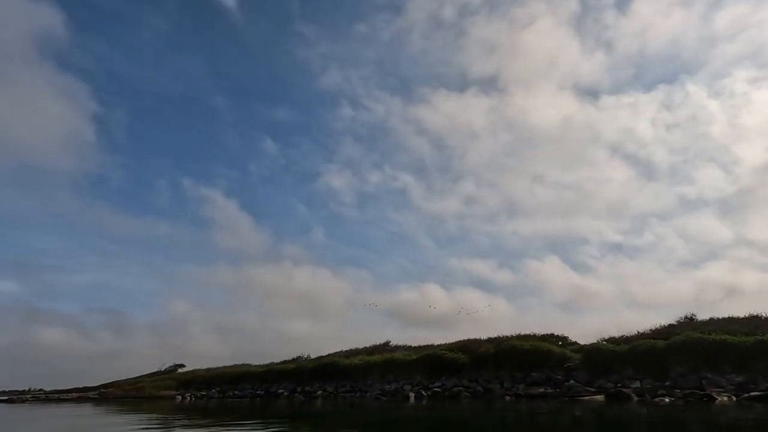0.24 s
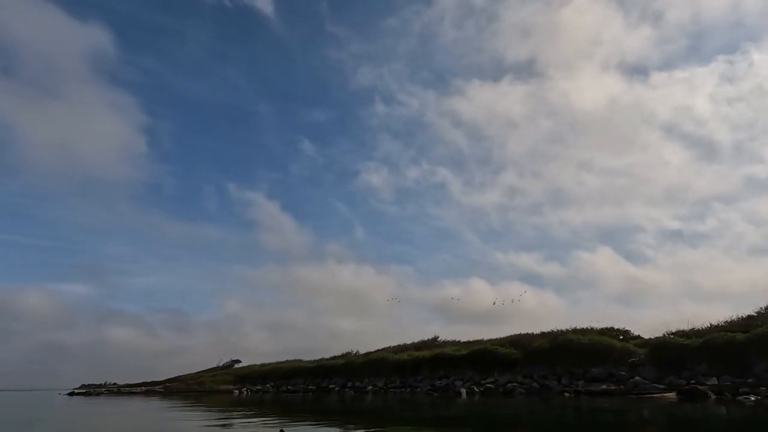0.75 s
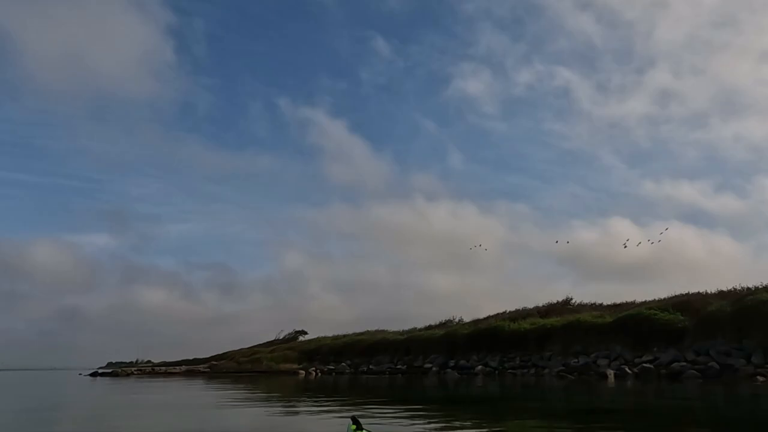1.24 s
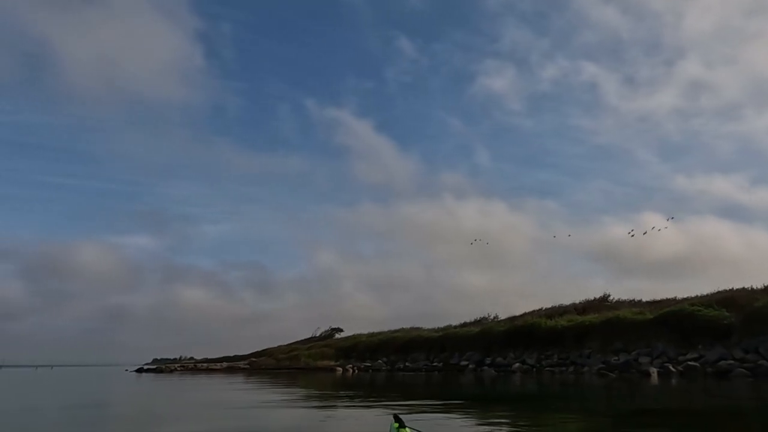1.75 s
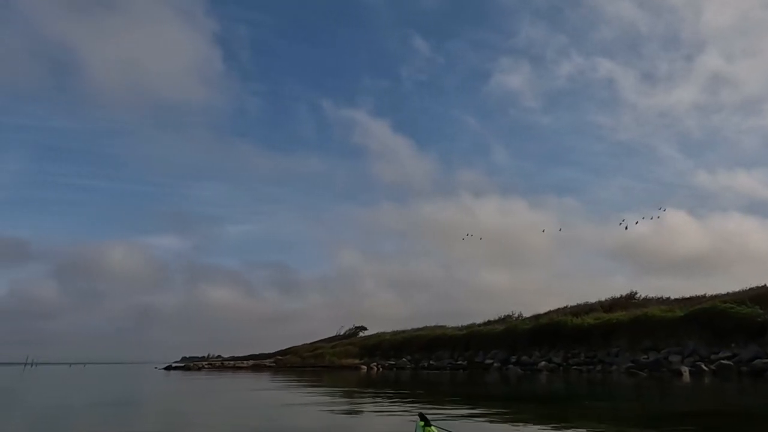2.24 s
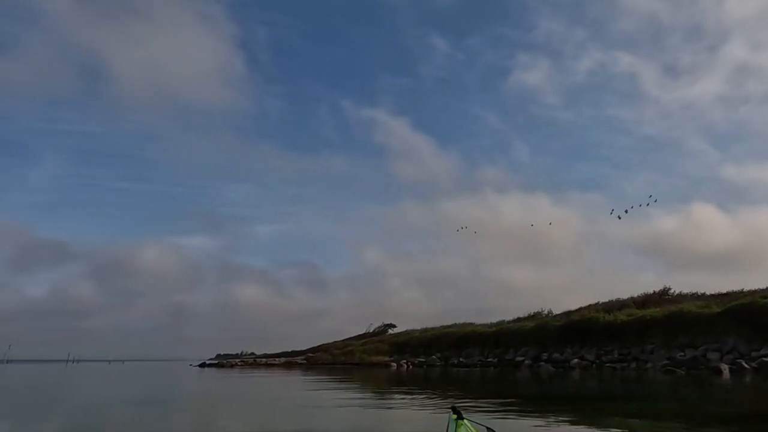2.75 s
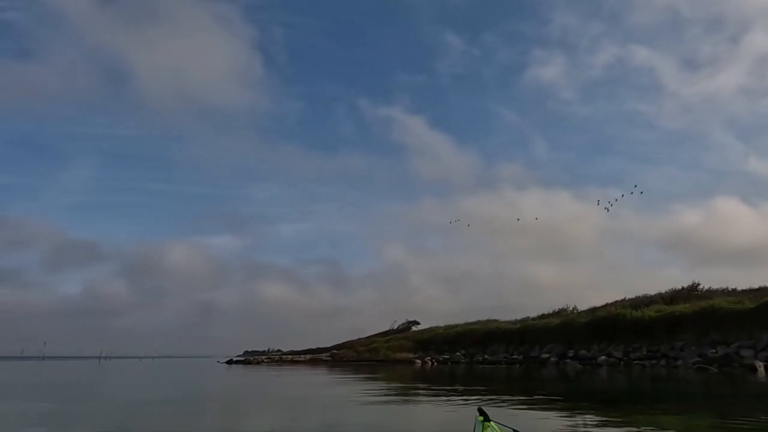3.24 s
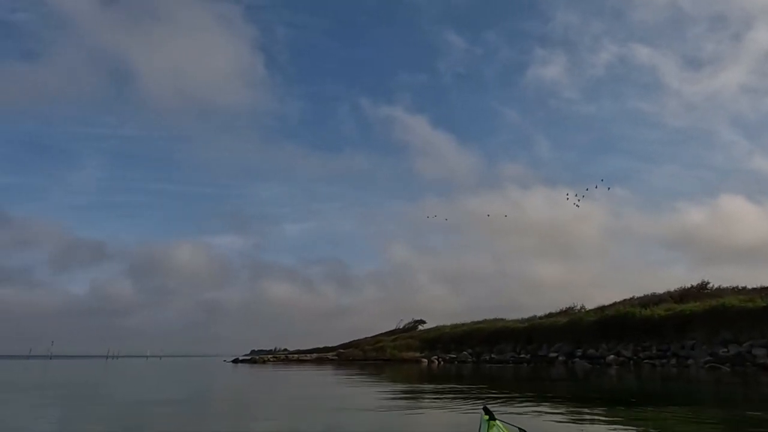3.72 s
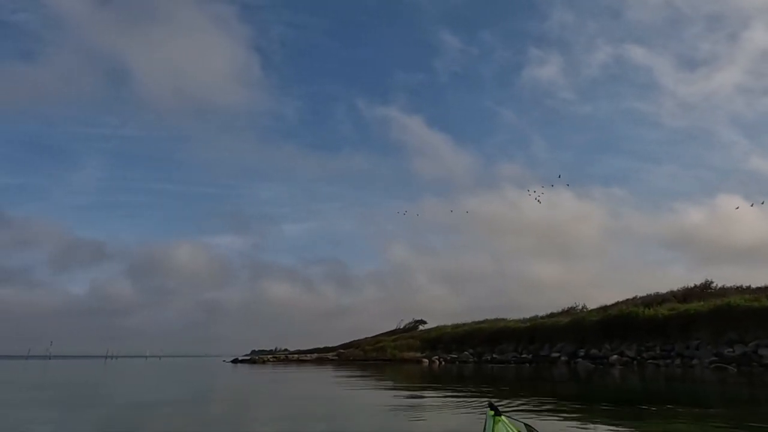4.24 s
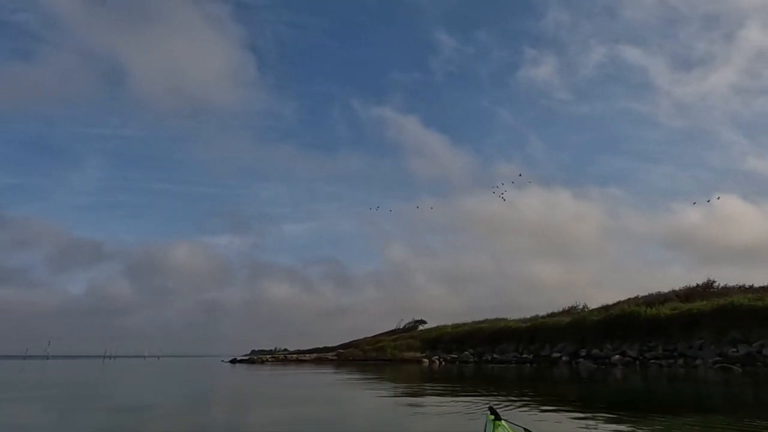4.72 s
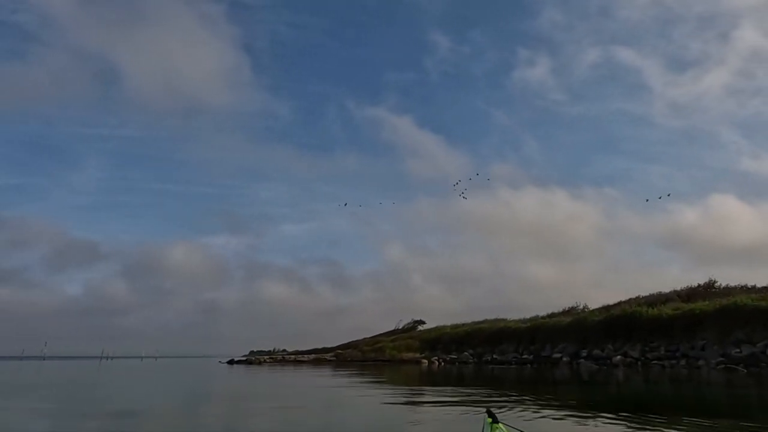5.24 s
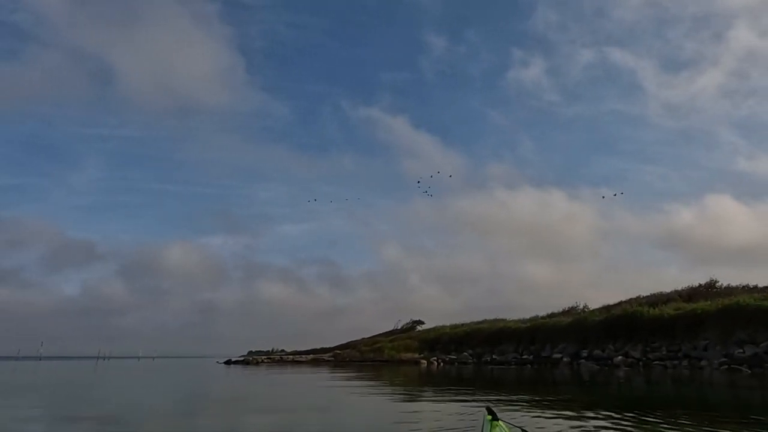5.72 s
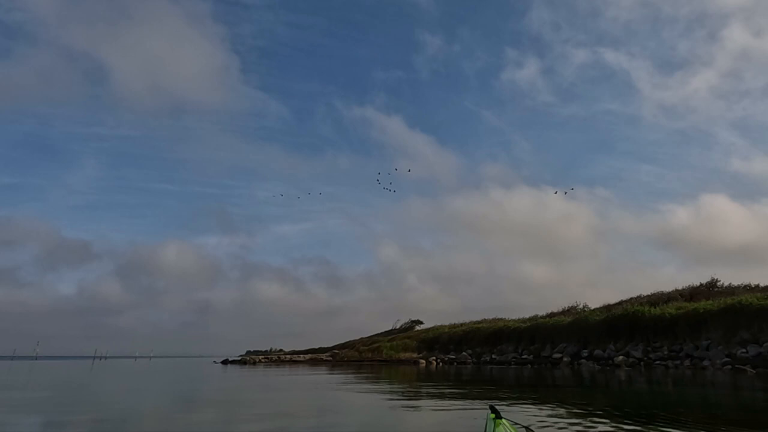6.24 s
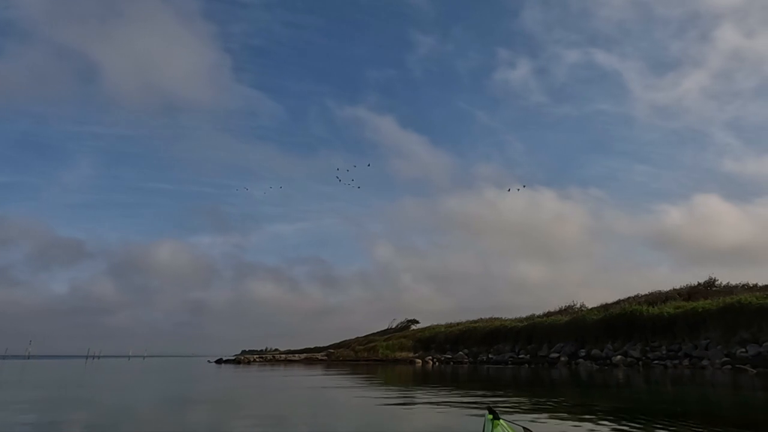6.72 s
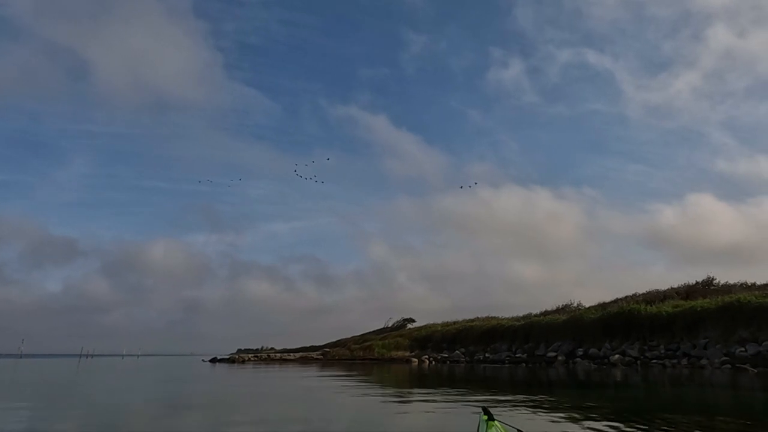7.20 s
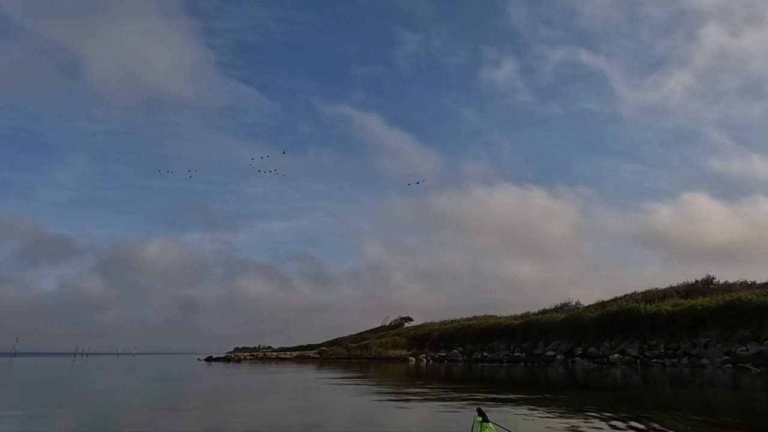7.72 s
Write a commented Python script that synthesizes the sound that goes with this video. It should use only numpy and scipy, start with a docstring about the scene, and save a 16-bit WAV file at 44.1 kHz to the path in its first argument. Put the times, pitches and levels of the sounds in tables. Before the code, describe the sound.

Geese honk as they fly over calm water, nearer calls standing out from a distant babble, with low wind rumbling on the microphone.

```python
"""Skeins of geese fly honking over a kayak on calm water, single birds calling out of a far babble.
Each honk follows the source-filter principle: pulses from the syrinx excite a long, nasal windpipe.
Water and bank return reflections. Light gusts rumble and thump at the two microphone ports,
water hisses faintly over a low drone, and near the end a jacket rustles and gear ticks."""
import sys
import numpy as np
from scipy import signal
from scipy.fft import rfft, irfft, next_fast_len
from scipy.io import wavfile
from scipy.ndimage import uniform_filter1d

SR = 44100
rng = np.random.default_rng(int(sys.argv[2]) if len(sys.argv) > 2 else 0)


def put_to_file(sound):
    """Save the sound as 16-bit audio at rate SR, in the file named by the first command-line argument."""
    columns = np.atleast_2d(sound).T  # one column per channel
    safe = np.clip(columns, -1, 1)
    whole_steps = np.round(safe * 32767)
    wavfile.write(sys.argv[1], SR, whole_steps.astype(np.int16))


N = 351036
TIME = np.arange(N) / SR

# Levels are relative, ahead of each source's gain; pan is left over right; roughness runs from 0 to 1.
# Noise spectra: f/Hz, spectral level/dB
AIR_SPECTRUM = [(30, -10), (130, -4), (205, -2), (290, -8), (500, -20), (800, -26.5), (2000, -24.5),
                (4500, -37.5), (7500, -42.5), (9000, -64.5), (12000, -58.5), (15000, -69)]  # steady air and water
WASH_SPECTRUM = [(2000, -23), (4500, -2), (6800, 0.5), (8200, -9), (11000, -15.5), (14000, -30),
                 (15500, -46)]  # water along the hull
RUMBLE_SPECTRUM = [(8, -11.5), (20, 0), (29, -5.5), (42, -9.5), (60, -11), (110, -38.5), (300, -88.5),
                   (3000, -140)]  # slow eddies
BUFFET_SPECTRUM = [(25, -41), (60, -5.5), (100, -4), (150, -16.5), (230, -23), (400, -35.5), (1000, -58.5),
                   (6000, -130)]  # faster flutter of the wind
CLOTH_SPECTRUM = [(150, -21.5), (700, 4), (2000, 1.5), (4000, 1), (6000, 0), (8000, -8), (10000, -15.5),
                  (13000, -23), (15500, -41)]  # sliding cloth
SCRAPE_SPECTRUM = [(80, -8.5), (250, 2.5), (420, -5), (700, -15), (1500, -18), (4000, -50)]  # dull scrape of the hardest rub
# Swells of water hiss: centre t/s, 1/e half-width/s, level/dB
WASHES = [(0.39, 0.13, -67.5), (0.585, 0.036, -62.5), (2.304, 0.18, -80), (4.9, 0.2, -75),
          (7.673, 1, -75.5)]
# Envelope of the jacket's rubbing: t/s, level/dB
RUB_ENVELOPE = [(6.62, -84.5), (6.74, -78), (6.844, -88.5), (6.998, -80), (7.016, -68.5), (7.068, -70.5),
                (7.132, -69), (7.166, -81.5), (7.25, -88)]
# Ticks of gear: t/s, peak level/dB, f/Hz
GEAR_TICKS = [(6.572, -51.5, 7300), (6.589, -46, 6640), (6.889, -55, 6000), (7.012, -56, 5580),
              (7.466, -62, 7240), (7.923, -55, 6660)]
# Gusts: peak t/s, decay time/s, rumble level/dB, buffet level/dB
GUSTS = [(0.0, 0.13, -32.5, -45), (0.18, 0.058, -32, -27), (0.34, 0.12, -27, -42.5),
         (0.72, 0.11, -32.5, -33), (0.89, 0.53, -37.5, -56.5), (1.74, 0.31, -31.5, -46),
         (2.76, 0.19, -40, -59), (3.88, 0.043, -35, -48), (4.94, 0.19, -35.5, -43.5),
         (5.56, 0.13, -39.5, -48), (6.409, 0.2, -38, -44), (7.3, 0.2, -51, -48.5), (7.74, 0.22, -30.5, -53)]
# Thumps of air and handling: t/s, level/dB, ring f/Hz, decay time/s, upper f/Hz of the puff, pan/dB
THUMPS = [(0.146, -19, 113.7, 0.016, 273, -6.5), (0.219, -22.5, 151, 0.017, 266, -3.5),
          (0.582, -19, 216, 0.0089, 344, -4), (0.605, -17.5, 180.4, 0.015, 302, -4),
          (0.638, -17.5, 100, 0.017, 275, -7), (0.710, -13, 105, 0.016, 303, -5.5),
          (1.216, -33.5, 125, 0.0085, 140, -2), (4.943, -31, 107, 0.015, 161, -10),
          (5.533, -34, 111.3, 0.0093, 139, -11), (6.31, -27, 162, 0.0042, 172, -11),
          (7.009, -41, 280, 0.0032, 430, 2), (7.033, -44, 200, .009, 260, -4),
          (7.049, -33, 290, 0.0044, 400, 4), (7.051, -31, 580, 0.0035, 1000, 2),
          (7.094, -35.5, 160, 0.0068, 380, -1), (7.615, -28.5, 80, 0.01, 120, -7),
          (7.677, -20.5, 52.3, 0.015, 134, -6), (7.714, -16, 66, 0.0099, 125, -1),
          (7.779, -19.5, 56.4, 0.0086, 118, -4), (7.863, -21, 96, 0.0086, 137, -5.5)]
# Envelope of the far flock: t/s, first-resonance level/dB, treble level/dB
FLOCK_ENVELOPE = [(0.0, -47.5, -55), (0.29, -50.5, -52.5), (0.44, -50, -54), (0.58, -51, -58),
                  (0.82, -50, -56.5), (1.11, -64, -66), (1.37, -58.5, -62), (1.6, -53.5, -56.5),
                  (2.05, -56, -63), (2.36, -58, -62), (2.5, -54.5, -54.5), (2.84, -59, -62.5),
                  (3.26, -55, -61.5), (3.6, -56.5, -65), (3.75, -62, -68.5), (3.86, -53, -58),
                  (4.01, -56, -56), (4.3, -60, -61.5), (4.45, -55.5, -63.5), (4.75, -54, -60.5),
                  (4.92, -54.5, -63), (5.16, -60.5, -67.5), (5.99, -54.5, -60), (6.18, -52.5, -62.5),
                  (6.34, -54.5, -88), (6.47, -72, -76), (6.901, -59.5, -63.5), (7.21, -58, -60),
                  (7.45, -60, -70), (7.7, -57.5, -68.5), (7.96, -63, -73)]
# Filter that colours the far flock: f/Hz, gain/dB
FLOCK_FILTER = [(400, -33), (700, -9.5), (880, -4), (1050, 3.5), (1400, 2.5), (1800, -9.5), (2300, -17.5),
                (2700, -18.5), (3150, -17.5), (4200, -33.5), (7000, -33), (11000, -80)]
# Single honks of near and farther geese: t/s, duration/s, top pitch f/Hz, crest position (0-1),
# bend of the pitch arch, level/dB, swell from start to end/dB, resonances 1-3 f/Hz,
# resonances 2-4 level/dB re the first, pan/dB, roughness
HONKS = [ (0.079, 0.059, 258.6, 0.56, 0.19, -44.5, -8.5, 1460, 1700, 3850, -3.5, -7.5, -5, -2, 0.56),
         (0.161, 0.18, 455.4, 0.13, 0.27, -46.5, -3, 1256, 1470, 3550, -0.5, -9, -12.5, -3.5, 0.25),
         (0.233, 0.071, 221.4, 0.38, 0.18, -45.5, -10, 1290, 2900, 3830, -19.5, -11, -21, 9, 0.46),
         (0.358, 0.098, 461, 0.07, 0.26, -50.5, -6, 1240, 1510, 3640, 2.5, -7, -10, -4, 0.44),
         (0.656, 0.13, 282, 0.44, 0.14, -48.5, -4.5, 1230, 2200, 3920, -25, -33, -29, 8.5, 0.14),
         (1.488, 0.17, 286.7, 0.47, 0.44, -47, 1, 1340, 2500, 3050, -8.5, -11, -15.5, 6, 0.63),
         (1.629, .15, 338, 0.1, 0.19, -55.5, 2, 1480, 2400, 3290, -16, -11, -7, -3, 0.53),
         (2.207, 0.14, 274, 0.02, 0.096, -54, -6, 1550, 2400, 2830, -1.5, -8, -22, 9, 0.36),
         (2.442, 0.14, 222.8, 0.69, 0.19, -50, 4, 1060, 2750, 3260, -4, -11.5, -9.5, 6.5, 0.4),
         (2.542, 0.16, 223, 0.17, 0.22, -50, 1, 1210, 2700, 2960, -8, -16, -19, 10.5, 0.02),
         (2.728, 0.14, 254, 0.14, 0.11, -62, 2, 1260, 2170, 2950, 7.5, 4, -13, 8.5, 0.3),
         (2.89, 0.12, 260, 0.45, 0.072, -52.5, 5, 1170, 1500, 3280, -24, -31, -36, 14, 0.26),
         (2.961, 0.059, 246.3, 0.85, 0.14, -49, 3, 1340, 2450, 3790, -1, -6, -11.5, -4, 0.53),
         (2.994, 0.093, 357, 0.16, 0.065, -47, 2, 1260, 2440, 3630, -13, -19, -18, 1, 0.22),
         (3.092, 0.07, 257.6, 0.24, .04, -50.5, 0, 970, 2170, 3190, -2.5, -8, -8.5, -0.5, 0.27),
         (3.13, 0.13, 257, 0, 0.06, -57.5, -6, 1100, 2200, 2900, -4, -10, -22, 8, 0),
         (3.301, 0.11, 222, 0.56, 0.13, -53, 0, 1140, 2220, 3000, -3, -11, -37, 10, 0.22),
         (3.469, 0.096, 219.6, 0.02, 0.068, -55, 8, 1180, 2550, 2980, -14, -12, -40, 15, 0.13),
         (3.605, 0.052, 281.3, 0.64, 0.097, -48, 0, 1010, 2200, 3420, -9.5, -8, -11, -3, 0.17),
         (3.634, 0.074, 397, 0.05, 0.19, -56, -13, 1260, 2200, 3150, -5, -4, -3.5, -3, 0.3),
         (3.775, 0.14, 262.3, 0.42, 0.14, -46.5, 8, 1050, 1800, 3800, -15.5, -14, -16.5, -3, 0.28),
         (4.068, 0.077, 389, 0, 0.064, -60, 1, 1300, 3140, 3940, 2, -1, -13, 2, 0.2),
         (4.806, 0.085, 377, 0.1, 0.089, -49, 4, 1270, 2300, 3150, -8, -17, -18.5, 2.5, 0.38),
         (4.89, 0.067, 275.4, 0.44, 0.039, -56, 4, 930, 2000, 2950, -7, -9, -16, 10, 0.23),
         (4.935, 0.13, 411, 0, 0.11, -57.5, -2, 780, 2270, 3100, -5, -26, -24, 18, 0),
         (4.98, 0.1, 286.5, 0.2, 0.16, -55, -3, 1270, 2400, 3100, -14, -23, -34, 7, 0.1),
         (5.024, 0.14, 399.4, 0.04, 0.15, -62.5, 9, 1530, 2440, 3100, 2.5, -8, -15.5, 12.5, 0),
         (5.14, 0.064, 265, 0.02, 0.094, -54.5, -2, 990, 2500, 3240, -13, -10, -24, 6.5, .08),
         (5.427, 0.16, 209.5, 0.35, 0.26, -59.5, -8, 1020, 2600, 2940, -18, 5.5, -14, 11, 0),
         (5.54, 0.17, 201.9, 0.02, 0.078, -57.5, 4, 1055, 2550, 2820, -14.5, -17.5, -46, 30.5, 0.14),
         (6.085, 0.044, 370.6, 0.08, .1, -48.5, -1, 1230, 2400, 3570, -11, 0, -20, 1.5, 0.37),
         (6.313, 0.061, 251.7, 0.36, 0.099, -53.5, -6, 990, 3000, 3390, -16, -2.5, -16.5, 1.5, 0.52),
         (7.096, 0.088, 210.6, 0.52, 0.13, -51, -2, 1290, 2300, 3000, -2, -7.5, -12, -2, 0.06),
         (7.158, 0.052, 340.6, 0.05, 0.057, -47, 3, 1210, 2400, 3170, -8, -11, -17, 1.5, 0.1),
         (7.187, 0.074, 212.7, .2, 0.093, -46, -3, 1250, 2260, 3160, -2.5, -13, -25, 2.5, 0.25),
         (7.232, 0.089, 253, 0.01, 0.056, -50.5, -5.5, 1080, 2140, 3080, -3, -2.5, -8.5, 1.5, 0.2),
         (7.338, 0.062, 274, .5, .05, -54, 7, 1270, 2000, 3050, -13, -15, -30, 14, 0),
         (7.371, .11, 400, 0, 0.055, -58.5, -2, 1620, 2370, 3130, -12, -11, -28, 9.5, 0),
         (7.381, 0.056, 267, 0.04, .06, -55, -1, 940, 2400, 3100, -17, -22, -30, 17.5, 0.25),
         (7.515, 0.11, 283, 0.08, 0.067, -55.5, -9, 1200, 2390, 3120, -13, -14, -33, 12, .06),
         (7.655, 0.098, 219.7, 0.43, 0.079, -56.5, 4, 1180, 2200, 3150, -17, -24, -31, 15, 0.23),
         (7.811, 0.089, 246.5, 0.01, 0.13, -57.5, 2, 1330, 2300, 3100, -21, -20, -32, 14, 0.33)]
# Honks of the nearest geese, each with a windpipe and its own course of pitch and hoarseness.
# Windpipe: resonances 1-4 f/Hz, third, fourth and top resonance level/dB re the second, pan/dB
# Course: t/s, pitch f/Hz, roughness, first-resonance level/dB, treble level/dB
NEAREST_HONKS = [ ((1422, 2853, 3400, 4500, -5, -2.5, -3.5, -3), [(0.82, 228.2, 0.86, -50, -52),
                 (0.84, 243, 0.17, -44.5, -53), (0.865, 237.3, 0.28, -47, -53),
                 (0.888, 221, 0.42, -54, -60), (0.92, 237, 0.3, -46.5, -58), (0.96, 229, 0.4, -55, -56)]),
                 ((1446, 2255, 3478, 4570, 4.5, 2.5, -5, -3.5), [(0.93, 269.7, 0.61, -50, -57),
                 (0.965, 279, 0.2, -56.5, -54), (1.01, 259.5, 0.15, -55, -53),
                 (1.035, 271, 0.37, -57, -52.5), (1.058, 270, 0.8, -56, -57)]),
                 ((1559, 2420, 3252, 4150, -5.5, 0, -14, -4), [(3.038, 396, 0.7, -48, -54),
                 (3.058, 402.4, 0.6, -50, -49), (3.074, 414, 0.4, -46, -49),
                 (3.112, 378.5, 0.36, -51, -52)]), ((1120, 2450, 3250, 4346, -1, -2.5, -4.5, -3),
                 [(3.825, 240, 0.8, -54, -54), (3.855, 261.5, 0.67, -56, -50.5),
                 (3.9, 244.4, 1.02, -54, -49), (3.93, 232, 0.36, -51, -52.5), (3.975, 205, 0.5, -51, -52)]),
                 ((1037, 2100, 3330, 4200, 3.5, 2.5, -8.5, -4), [(3.955, 258.4, 0.56, -51, -54),
                 (3.99, 255.8, 0.1, -47, -48.5), (4.022, 266.3, 0.3, -48, -47.5),
                 (4.052, 254, 0.45, -48, -50.5), (4.128, 250, 1, -71, -62)]),
                 ((1251, 2304, 3557, 4601, -8, -16, -31.5, -1.5), [(5.323, 200.7, 0.46, -54, -48),
                 (5.343, 201.7, 0.25, -52, -44), (5.365, 215.2, 0.2, -55, -46.5),
                 (5.387, 219, 0.03, -52, -48.5), (5.42, 200.8, 0, -57, -50),
                 (5.47, 192.6, 0.8, -48.5, -52.5)]), ((1094, 2300, 3623, 4700, 0.5, -12.5, -14.5, 2),
                 [(5.818, 197.2, 1, -47, -58), (5.848, 198.2, 0.7, -49, -51.5),
                 (5.893, 204.4, 0.32, -48, -52), (5.92, 203.5, 0.55, -45, -50.5),
                 (5.942, 211.7, 0.8, -53, -51), (5.962, 207, 1, -52, -57)]),
                 ((1401, 2400, 3600, 4600, 11, -8, -19, -0.5), [(6.04, 225.6, 0.8, -52, -60),
                 (6.06, 231.5, 0.6, -51, -49), (6.103, 237.6, 1, -49, -51)]),
                 ((1297, 2402, 3653, 4751, -0.5, -16, -20.5, 1.5), [(6.127, 206.5, 0.65, -47, -45),
                 (6.145, 216.7, 0.33, -47.5, -44.5), (6.18, 217, 0.05, -51, -46.5),
                 (6.205, 208, 0.33, -49, -47), (6.226, 206, 0.5, -54, -47)]),
                 ((1356, 2380, 3500, 4450, -3.5, -14, -23, -0.5), [(6.208, 221, 0.65, -49, -45),
                 (6.228, 231.4, 0.54, -48, -49), (6.27, 219.4, 0.32, -51, -47.5),
                 (6.298, 204.4, 0.4, -52, -47), (6.326, 204, 0.6, -62, -53)]),
                 ((1080, 2232, 3234, 4330, -0.5, -2.5, -9, -0.4), [(6.536, 191.6, 0.8, -58.5, -62),
                 (6.578, 199.3, 0.55, -47.5, -49), (6.605, 204.8, 0.14, -44.5, -48.5),
                 (6.643, 204, 0, -47, -54.5), (6.658, 199, 0.7, -51.5, -61),
                 (6.694, 202.7, 0.8, -53, -53)])]
# Windpipe bandwidths before broadening: resonance 1 width/Hz, 2-3 width/Hz, higher ones width/Hz
BANDWIDTHS = (380, 420, 650)


def gain_of(db):
    """Amplitude ratio: a factor of ten for every 20 dB."""
    return 10 ** (np.asarray(db) / 20)


def unit_rms(x):
    """Normalisation to unit mean power."""
    return x / np.sqrt(np.mean(x ** 2) + 1e-20)


def sides(pan_db):
    """Level difference between the ports, as left and right gains."""
    return gain_of([[pan_db / 2], [-pan_db / 2]])


def add(mix, start_s, sound):
    """Superposition: a sound sums into the mix from its starting time."""
    start = round(start_s * SR)
    sound = sound[:, max(-start, 0):]
    part = mix[:, max(start, 0):][:, :sound.shape[1]]
    part += sound[:, :part.shape[1]]


def coloured(x, spectrum):
    """Filtering by multiplication of spectra; the result has unit power."""
    f, db = np.transpose(spectrum)
    size = next_fast_len(x.shape[-1])
    hz = np.fft.rfftfreq(size, 1 / SR)
    response = gain_of(np.interp(np.log(hz + 1), np.log(f), db))
    return unit_rms(irfft(rfft(x, size) * response, size)[..., :x.shape[-1]])


def wander(size, hz):
    """Random modulation: straight lines join hz Gaussian values a second."""
    at = np.arange(size) * hz / SR
    return np.interp(at, np.arange(size // 8 + 2), rng.standard_normal(size // 8 + 2))


def noise_pair(spectrum, correlation):
    """Partial coherence: the two ports share part of a coloured noise."""
    a, b = rng.standard_normal((2, N))
    return coloured(np.array([a, correlation * a + np.sqrt(1 - correlation ** 2) * b]), spectrum)


def levelled(x, times, db, window=14000):
    """Envelope shaping: the running RMS follows a curve while quick swings remain."""
    power = abs(uniform_filter1d((x ** 2).mean(0), size=window))
    return x / np.sqrt(power + 1e-12) * gain_of(np.interp(TIME, times, db))


def resonate(x, hz, width_hz, order=3):
    """Moving resonance by heterodyning: shift hz to zero, low-pass in cascade, shift back."""
    carrier = np.exp(2j * np.pi * np.cumsum(hz * np.ones(len(x))) / SR)
    pole = np.exp(-np.pi * width_hz / SR)
    x = x / carrier + 1e-18
    for _ in range(order):
        x = signal.lfilter([1 - pole], [1, -pole], x)
    return 2 * (carrier * x).real


def drone(level_db=-60, centre_hz=190):
    """Narrow-band noise with a drifting centre is heard as a faint, wavering drone."""
    hz = centre_hz + 16 * wander(N, 5.4)
    return gain_of(level_db) * unit_rms(resonate(rng.standard_normal(N), hz, width_hz=70))


def water():
    """Amplitude modulation: hiss swells in Gaussian envelopes, like water sliding along the hull."""
    envelope = sum(gain_of(db) * np.exp(-((TIME - centre) / half) ** 2) for centre, half, db in WASHES)
    return noise_pair(WASH_SPECTRUM, 0.48) * envelope


def jacket(grain_db=3, cloth_db=19, scrape_db=-51):
    """Friction: cloth slides in small slips, and the hardest rub adds a dull scrape."""
    rub_db = np.interp(TIME, *np.transpose(RUB_ENVELOPE), left=-140, right=-140)
    slips = gain_of(grain_db * wander(N, 350))
    cloth = noise_pair(CLOTH_SPECTRUM, 0.79) * gain_of(rub_db + cloth_db)
    scrape = noise_pair(SCRAPE_SPECTRUM, 1.0) * gain_of(scrape_db + 1.02 * (rub_db - rub_db.max()))
    return slips * (cloth + scrape)


def gear_ticks(decay_s=0.0083):
    """Transient excitation: each tick is a dying burst of noise through a broad resonance."""
    mix, t = np.zeros((2, N)), np.arange(SR // 30) / SR
    for start, db, hz in GEAR_TICKS:
        tick = resonate(rng.standard_normal(len(t)) * np.exp(-t / decay_s), hz, width_hz=4100)
        add(mix, start, sides(0) * gain_of(db) * tick / abs(tick).max())
    return mix


def wind(breeze_db=(-52, -69.5), rise_share=0.7, rumble_gain_db=2, buffet_gain_db=-2, lumps_db=4):
    """Turbulence: eddies rumble and flutter at the ports; gusts add in power to a light breeze."""
    times = TIME[::100]
    power = gain_of(breeze_db)[:, None] ** 2  # rows: rumble, buffet
    for peak, decay, *db in GUSTS:
        envelope = np.exp(-np.maximum((peak - times) / rise_share, times - peak) / decay)
        power = power + np.outer(gain_of(db), envelope) ** 2
    rumble_db, buffet_db = 10 * np.log10(power)
    rumble = levelled(noise_pair(RUMBLE_SPECTRUM, 0.88), times, rumble_db + rumble_gain_db, window=5000)
    flutter = noise_pair(BUFFET_SPECTRUM, .6) * gain_of(lumps_db * wander(N, 30))
    buffet = levelled(flutter, times, buffet_db + buffet_gain_db, window=7000)
    return rumble * sides(-2.5) + buffet


def thumps(puff_db=-9, puff_s=0.0087, rise_s=0.0092, max_phase_rad=1.35):
    """Damped oscillation: air and handling give a dull puff and a few cycles of pressure."""
    mix, t = np.zeros((2, N)), np.arange(SR // 5) / SR
    for start, db, hz, decay, top_hz, pan_db in THUMPS:
        phase = max_phase_rad * min(hz / 110, 1) ** 2  # low rings are more in step at the two ports
        envelope = np.exp(1 - t / decay) * (1 - np.exp(-t / rise_s))
        ring = np.sin(2 * np.pi * hz * t + np.array([[0], [phase]])) * envelope
        band = signal.butter(3, [60, top_hz], "band", fs=SR)
        puff = unit_rms(signal.lfilter(*band, rng.standard_normal((2, len(t)))))
        puff *= gain_of(puff_db) * t / puff_s * np.exp(1 - t / puff_s) * min(decay / 0.013, 1)
        add(mix, start, gain_of(db) * sides(pan_db) * (0.71 * ring + puff))
    return mix


def shore_echoes(x, t60_s=0.95, cutoff_hz=2600, echoes_per_s=2000):
    """Scattering: water and bank return dull echoes that die away exponentially."""
    t = np.arange(SR) / SR
    taps = rng.standard_normal((2, SR)) * (rng.random((2, SR)) < echoes_per_s / SR)
    taps *= gain_of(-60 * t / t60_s) * (t > .004)
    response = signal.lfilter(*signal.butter(2, cutoff_hz, fs=SR), taps / np.linalg.norm(taps[0]))
    return signal.fftconvolve(x, response, axes=1)[:, :N]


def water_reflection(x, db, delay_s):
    """Specular reflection: a call interferes with its delayed copy off the calm water."""
    return x + gain_of(db) * np.concatenate([np.zeros(int(delay_s * SR)), x])[:len(x)]


def at_ports(call, pan_db, max_delay_s=0.00021, full_pan_db=7.5):
    """Path difference: a bird on the left is louder there and reaches the right port later."""
    lag = round(max_delay_s * SR * np.clip(pan_db / full_pan_db, 0, 1))
    return sides(pan_db) * np.array([call, np.roll(call, lag)])


def syrinx(hz, rough, jitter=0.0299, shimmer=0.57, rasp=1.0):
    """Pulse-train source: roughness unsettles timing and strength and adds a puff of air per cycle."""
    size = len(hz)
    cycles = np.cumsum(hz * (1 + jitter * rough * wander(size, 223.9))) / SR
    harmonics = int(10000 / hz.max())
    pulses = np.sin((2 * harmonics + 1) * np.pi * cycles) / (np.sin(np.pi * cycles) + 1e-12) - 1
    pulses *= np.exp(shimmer * rough * wander(size, 304.3))
    puffs = np.exp(-(cycles % 1) / .55) * rng.standard_normal(size)
    return unit_rms(pulses) + rasp * rough * unit_rms(puffs)


def far_flock(count=170, low_gain_db=4.5, treble_gain_db=5.0, echo_db=-4.5):
    """Incoherent summation: short honks of distant birds, mostly to the left, merge into a babble."""
    mix = np.zeros((2, N))
    for k, (when, length, pitch, loud, place, pipe, jump) in enumerate(rng.random((count, 7))):
        u = np.linspace(0, 1, int((.08 + .11 * length) * SR))
        arch = 1 - .2 * (u - .6 * jump) ** 2 + .011 * wander(len(u), 45)
        upward_break = 1 + .42 * (jump > .75) * np.clip((u - .35) * 20, 0, 1)
        hz = (195 + 90 * pitch) * arch * upward_break
        voice = syrinx(hz, rough=0.28 + 0.34 * (1 - length))  # short calls are hoarser
        drive = water_reflection(voice, db=-2.5, delay_s=0.000972 + .003 * pipe)
        pipe_hz = (1000 + 400 * pipe) * arch
        call = unit_rms(sum(resonate(drive, mode * pipe_hz, 800, order=2) for mode in (1, 2, 3)))
        call *= np.sin(np.pi * u ** .7).clip(0) ** .7 * gain_of(5 * loud + 2 * wander(len(u), 40))
        heard = sides(7 * place + 2.64) * np.array([call, np.roll(call, int(4 + 12 * place))])
        add(mix, (k + when) / count * (N / SR + .2) - .2, heard)
    mix = coloured(mix + gain_of(echo_db) * shore_echoes(mix), FLOCK_FILTER)
    low = signal.sosfiltfilt(signal.butter(4, 1800, fs=SR, output="sos"), mix)
    times, low_db, treble_db = np.transpose(FLOCK_ENVELOPE)
    treble = levelled(mix - low, times, treble_db + treble_gain_db)
    hiss = noise_pair([(2500, -23.5), (5000, 8.5), (7500, -6.5), (10000, -8), (14000, -28)], 0.4)
    hiss *= gain_of(np.interp(TIME, times, low_db) - 23.0)  # swells with the chorus
    return levelled(low, times, low_db + low_gain_db) + treble + hiss


def honk(row, attack_s=0.012, release_s=0.024, ends_db=-3, slack=0.0534, waver=0.0071, flutter=0.17):
    """Source and filter: one arch of pitch, rasping at both ends, drives the windpipe's resonances."""
    (start, length, top_hz, crest, bend, level_db, swell_db,
     first, second, third, second_db, third_db, fourth_db, pan_db, rough) = row
    t = np.arange(0, length, 1 / SR)
    u = t / length
    breath = np.clip(np.minimum(t / attack_s, (length - t) / release_s), 0, 1)
    arch = 1 - bend * (u - crest) ** 2
    hz = top_hz * arch * (1 - slack * (1 - breath)) * (1 + waver * wander(len(t), 58.6))
    effort = breath * gain_of(level_db + swell_db * (u - .5) + ends_db * (2 * u - 1) ** 2)
    hoarse = np.clip(rough * (1 + 1.7 * abs(2 * u - 1) ** 3), .06, 1)
    drive = water_reflection(syrinx(hz, hoarse), db=-9, delay_s=rng.uniform(.0012, .0038))
    stretch = (hz / np.median(hz)) ** 0.84  # the resonances largely follow the pitch

    def formant(centre, width):
        """Resonance that broadens and wavers more in a rough voice."""
        moving = centre * stretch * (1 + .04 * rough * wander(len(t), 110))
        ring = resonate(drive, moving, width * (1 + 0.75 * rough))
        return unit_rms(ring * np.exp(flutter * hoarse * wander(len(t), 79)))

    narrow, middle, wide = BANDWIDTHS
    fourth = 1.335 * third
    upper = [(second, middle, second_db), (third, middle, third_db), (fourth, wide, fourth_db),
             (1.29 * fourth, wide, fourth_db - 9), (1.426 * fourth, wide, fourth_db - 14),
             (1.86 * fourth, 2 * wide, fourth_db - 25)]
    call = formant(first, narrow) + sum(gain_of(db) * formant(f, width) for f, width, db in upper)
    return start, at_ports(effort * call, pan_db)


def nearest_honk(pipe, course, edge_s=0.0097, flutter=0.45, hoarse_tilt_db=-9.5):
    """Aperiodic vibration: the voice starts hoarse, clears and cracks; roughness shakes its pitch."""
    first, second, third, fourth, third_db, fourth_db, top_db, pan_db = pipe
    times, *controls = np.transpose(course)
    t = np.arange(times[0], times[-1], 1 / SR)
    hz, rough, first_db, treble_db = (np.interp(t, times, control) for control in controls)
    rough = np.clip(rough, .05, .9)
    breath = np.clip(np.minimum(t - times[0], times[-1] - t) / edge_s, 0, 1)
    shaky_hz = hz * (1 + (.004 + .022 * rough ** 2) * wander(len(t), 160))
    drive = syrinx(shaky_hz, np.maximum(rough, .22), shimmer=.4, rasp=1.15)
    stretch = (hz / np.median(hz)) ** 0.45  # the resonances partly follow the pitch

    def formant(centre, width):
        """Resonance under random modulation of frequency and amplitude."""
        moving = centre * stretch * (1 + .018 * wander(len(t), 130))
        ring = resonate(drive, moving, width * 1.1)
        return unit_rms(ring * np.exp(flutter * np.tanh(wander(len(t), 85))))

    narrow, middle, wide = BANDWIDTHS
    second_db = hoarse_tilt_db * (rough - rough.mean())
    upper = [(second, middle, second_db), (third, middle, third_db), (fourth, wide, fourth_db),
             (1.312 * fourth, wide, top_db - 1), (1.7 * fourth, wide, top_db - 14)]
    treble = unit_rms(sum(gain_of(db) * formant(f, width) for f, width, db in upper))
    call = gain_of(first_db) * formant(first, narrow) + gain_of(treble_db) * treble
    return times[0], at_ports(breath * call, pan_db)


def geese(gain_db=1.0, echo_db=-10, beak_cutoff_hz=870, lag_fraction=0.026):
    """Radiation from a small opening: single honks leave the beak with little bass, then echo."""
    calls = np.zeros((2, N))
    for row in HONKS:
        add(calls, *honk(row))
    for pipe, course in NEAREST_HONKS:
        add(calls, *nearest_honk(pipe, course))
    # the left port lags by just over one sample, which places the birds a little to the right
    calls[0] = (1 - lag_fraction) * np.roll(calls[0], 1) + lag_fraction * np.roll(calls[0], 2)
    radiated = signal.sosfilt(signal.butter(6, beak_cutoff_hz, "high", fs=SR, output="sos"), calls)
    return gain_of(gain_db) * (radiated + gain_of(echo_db) * shore_echoes(radiated))


def scene(air_db=-57):
    """Linear superposition: the pressures of all sources add over the steady noise of air and water."""
    sources = geese() + drone() + far_flock() + wind() + thumps() + jacket() + gear_ticks() + water()
    return sources + gain_of(air_db) * noise_pair(AIR_SPECTRUM, 0.84)


def record(dry, fade_s=0.005, cutoff_hz=15000):
    """Band limiting: after a brief fade-in, a linear-phase low-pass removes the highest treble."""
    fade_in = np.minimum(TIME / fade_s, 1)
    low_pass = signal.firwin(511, cutoff_hz, window=("kaiser", 9), fs=SR)
    return signal.oaconvolve(dry * fade_in, low_pass[None], "same")


dry = scene()
out = record(dry)
put_to_file(out)
```